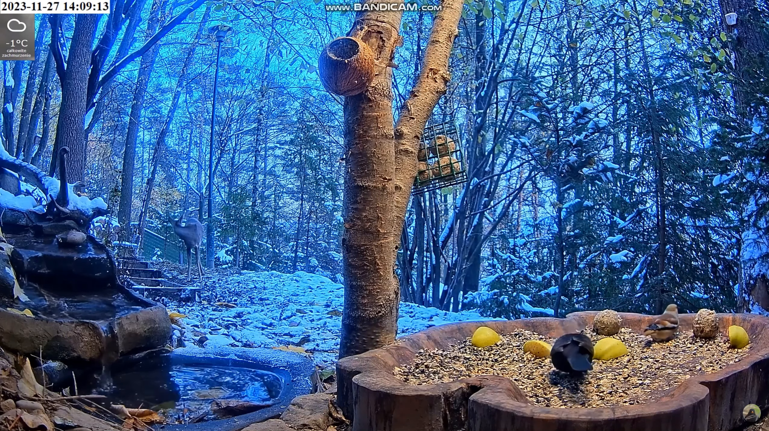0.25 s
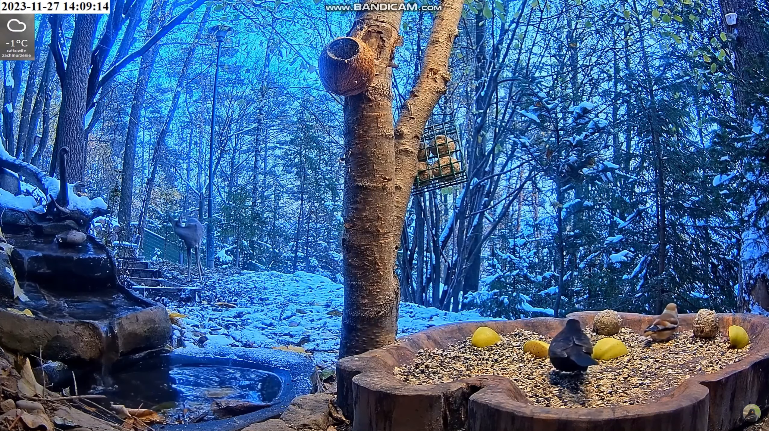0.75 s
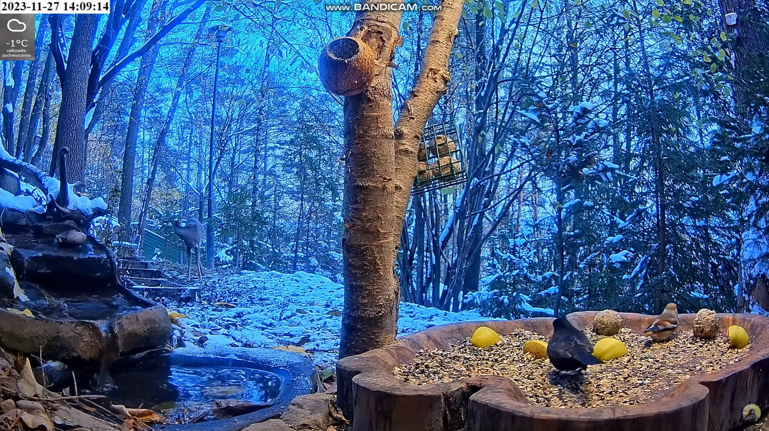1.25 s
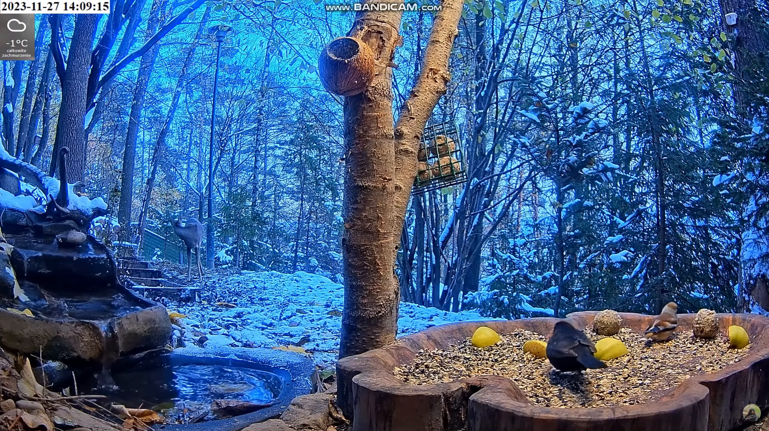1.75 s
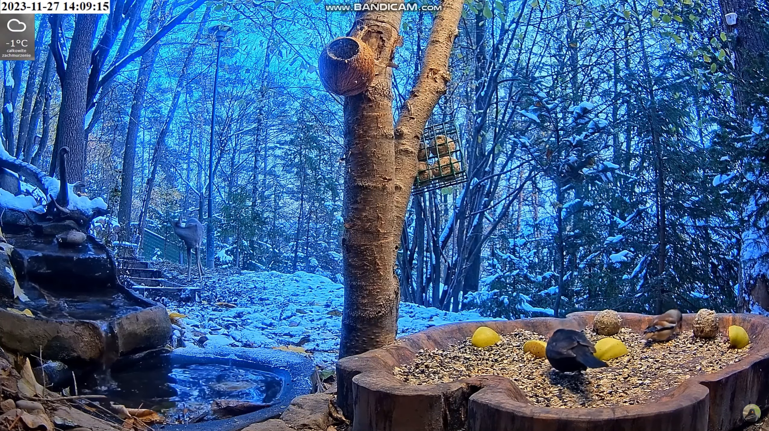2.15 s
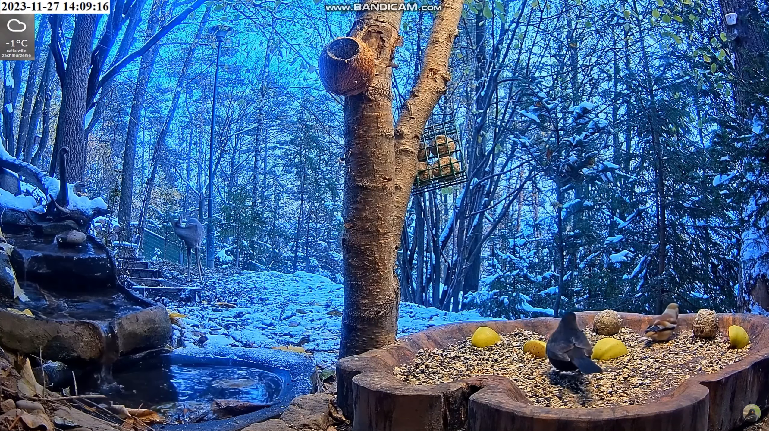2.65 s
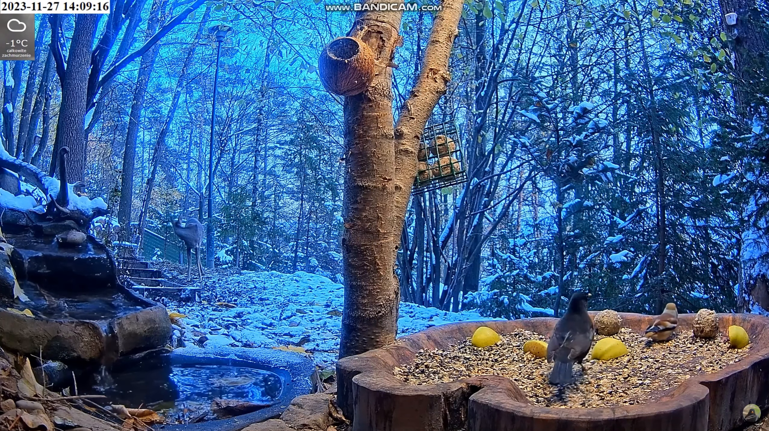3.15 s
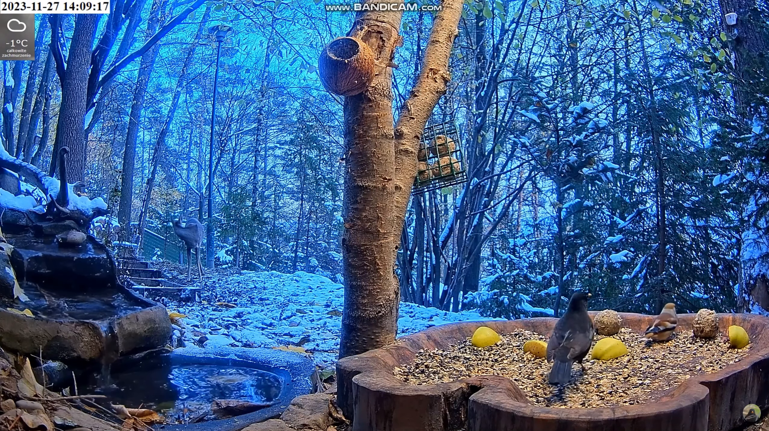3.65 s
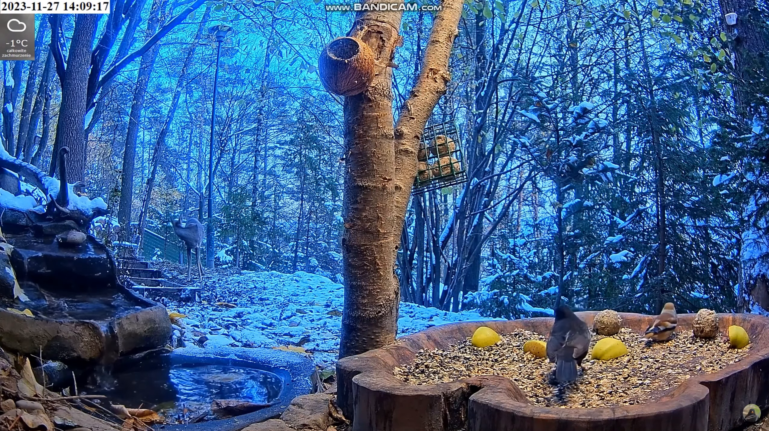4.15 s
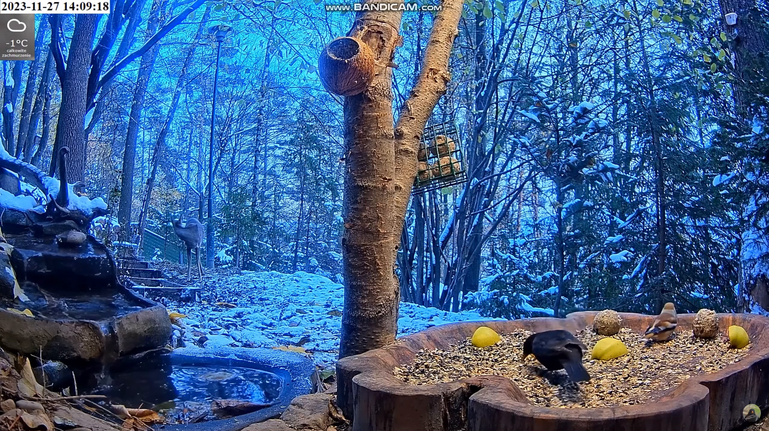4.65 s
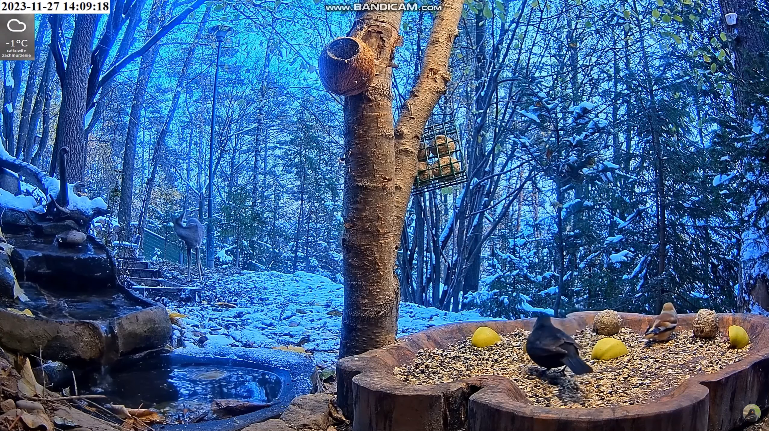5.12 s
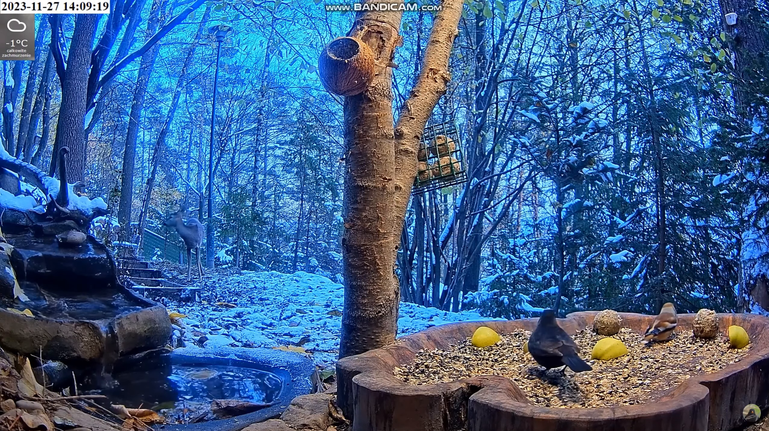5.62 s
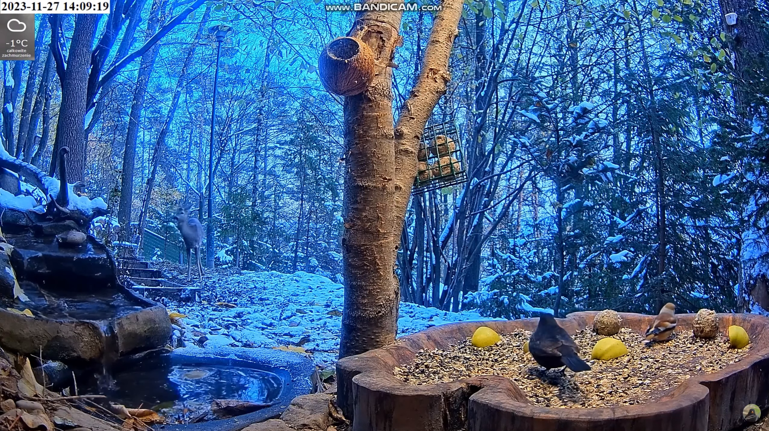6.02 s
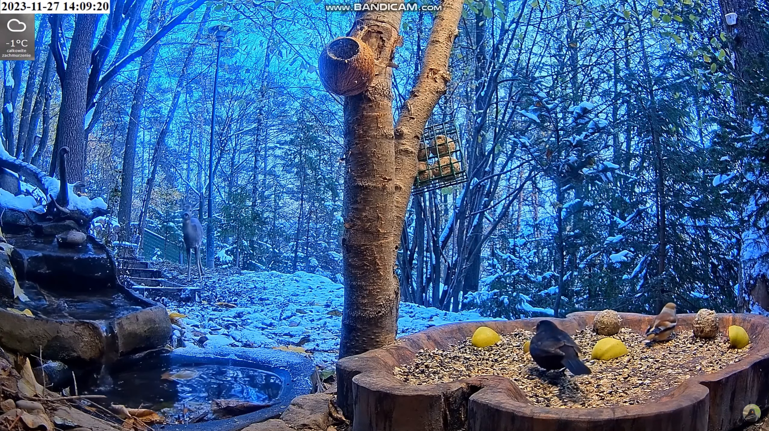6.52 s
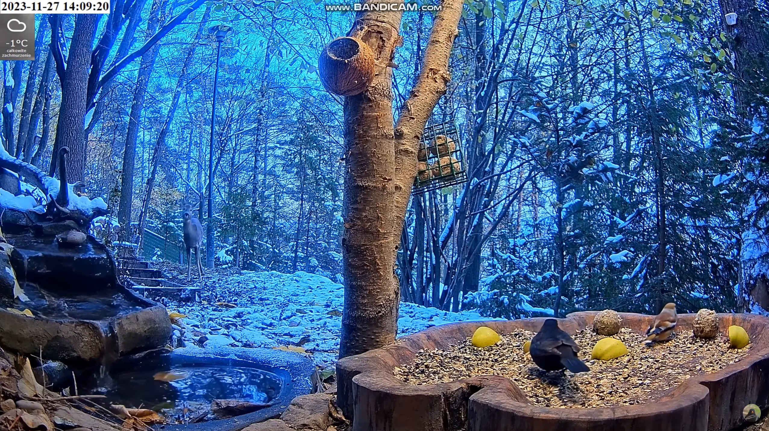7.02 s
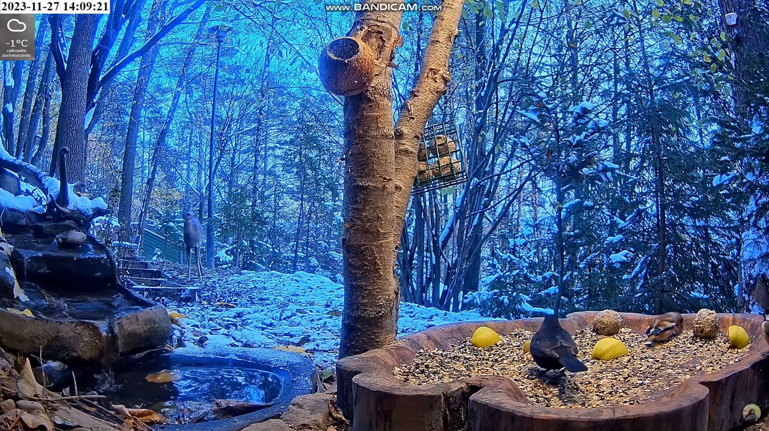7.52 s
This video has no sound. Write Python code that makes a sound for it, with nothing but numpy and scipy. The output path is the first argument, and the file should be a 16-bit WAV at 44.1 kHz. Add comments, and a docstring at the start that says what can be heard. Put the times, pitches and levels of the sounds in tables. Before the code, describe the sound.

In a quiet snowy wood, crisp water drops tick and spatter on rock while small bubbles ring and larger ones plop in a murmuring pool. The trickle flickers with tiny lulls and never stops. A muffled wing flutter passes just before five seconds, then a weaker one near the end. A small fixed camera microphone gives a thin, bright, resonant sound over faint hum, hiss and a slowly rising distant rush.

```python
"""From the start, a distant rush slowly grows over a faint mains hum and hiss in a winter forest.
A thin cascade trickles over rocks into a murmuring pool, as heard by a fixed outdoor camera.
At once drops tick and spatter, stone is tapped, and plunges gloop: splash noise plus ringing bubbles.
Stones and trunks echo and scatter the water sounds; weaker drops and bubbles fall at random times.
Near 4.7 s, and more weakly near 7.7 s, a small bird flutters: puffs of air with a feathery noise."""
import sys
import numpy as np
from scipy import signal
from scipy.fft import rfft, irfft, next_fast_len
from scipy.io import wavfile
from scipy.ndimage import uniform_filter1d

SR = 44100
rng = np.random.default_rng(int(sys.argv[2]) if len(sys.argv) > 2 else 0)


def unload_audio(sound):
    """Save the sound as a 16-bit wav file, at the path given as the first command line argument."""
    columns = np.transpose(np.atleast_2d(sound))
    # keep every value between -1 and 1, then stretch to whole-number steps
    steps = np.round(np.clip(columns, -1, 1) * 32767)
    wavfile.write(sys.argv[1], SR, steps.astype(np.int16))


N = 343098
TIME = np.arange(N) / SR  # t/s of the whole scene
GRAIN = np.arange(4096) / SR  # t/s within one short sound

# Levels in the tables are nominal: trims, channel balance and the final filters follow.
# Distant rush: initial level/dB and growth in dB/s
RUSH_DB, RUSH_DB_PER_S = -64.5, 0.7875
# Spectral density of the rush: [f/Hz, level/dB]
RUSH_SPECTRUM = [(25, -21), (80, -4), (150, -27.5), (280, 5), (430, -12.5), (600, 1), (760, -0.5),
                 (970, 7.5), (1150, 5), (1500, -5.5), (2100, -12), (2600, -14), (6000, -2), (14000, -37)]
# Spectral density of the rumble beneath it: [f/Hz, level/dB]
RUMBLE_SPECTRUM = [(25, -34), (80, -10), (120, -3.5), (170, -1.0), (250, -3.0), (310, -5.5),
                   (420, -2.0), (600, -7.0), (1500, -19), (14000, -69)]
# Mains hum partials: [f/Hz, rms level/dB]
HUM_PARTIALS = [(50, -72.5), (100, -80)]
# Spectral density of the hiss: [f/Hz, level/dB]
HISS_SPECTRUM = [(30, -3), (80, 0.5), (250, -3), (500, -2.0), (1000, -7.5), (2100, -6.0), (4500, -7.5),
                 (7000, -11.0), (9500, -9.5), (14000, -16.5)]
# Resonances of the camera housing: [f/Hz, width/Hz, level/dB]
HOUSING_MODES = [(1150, 1700, -15.5), (2521, 164, -1), (2778, 116, -8.5), (3090, 94, -7.5),
                 (3288, 200, -7.5), (3913, 160, -8.5), (4184, 140, 0), (4451, 192, 5), (4776, 790, -4),
                 (5353, 200, 2.5), (5560, 93, 0.5), (5770, 150, -0.5), (6160, 310, -1), (6448, 300, 2.5),
                 (7255, 390, 1), (8754, 480, -2), (10220, 480, -9.5), (10800, 960, -15),
                 (12300, 2800, -16.5)]
# Flow of the cascade: [t/s, fine trickle level/dB]
TRICKLE_FLOW = [(0.0, -55), (1.25, -54.5), (1.45, -54.5), (2.01, -52.5), (2.27, -55.5), (4.1, -54.5),
                (4.31, -56.5), (4.83, -51.5), (5.76, -54.5), (6.35, -57), (7.21, -52.5), (7.78, -55.5)]
# Moments when the stream thins: [t/s, length/s, level change/dB]
STREAM_LULLS = [(0.23, 0.026, -6), (0.906, 0.029, -7), (1.438, 0.033, -12), (3.07, .03, -5),
                (3.635, 0.043, -7), (4.29, 0.053, -3), (4.612, 0.021, -17), (5.286, .035, -16),
                (5.547, 0.042, -8), (5.787, .03, -15), (6.384, 0.039, -8)]
# Time a splash builds before its peak, in s
LEAD_S = .008
# Loudest drops on rock and water:
# [t/s, peak level/dB, bubble f/Hz, bubble over splash level/dB, relative top treble level/dB]
LOUD_DROPS = [(0.014, -41.5, 6440, -2, -38), (0.072, -36.5, 6660, 1, -32), (0.147, -44, 4220, 13, -30),
              (0.1915, -41, 4460, 22, -38), (0.199, -38.5, 5480, 14, -38), (0.258, -44.5, 5320, -3, -19),
              (0.3306, -39.5, 4450, 25, -36), (0.3735, -38, 4400, 26, -35), (0.399, -44, 4600, 19, -25),
              (0.4735, -33.5, 4370, 9, -40), (0.482, -38.5, 5100, 17, -37), (0.509, -45.5, 5400, 4, -25),
              (0.574, -39.5, 4480, -3, -23), (0.591, -41, 6270, -9, -7), (0.6555, -38, 4400, 5, -10),
              (0.807, -37, 6420, 2, -23), (0.842, -47, 6300, 9, -28), (1.0223, -34.5, 4430, 12, -38),
              (1.0405, -36, 5200, 23, -36), (1.136, -45.5, 4260, 0, -28), (1.147, -44, 6370, 0, -25),
              (1.212, -43, 5260, -7, -20), (1.263, -43.5, 4500, 0, -31), (1.28, -43, 4540, -5, -25),
              (1.397, -39, 5430, -18, -13), (1.5093, -32.5, 4410, 9, -39), (1.5275, -37.5, 4960, -2, -20),
              (1.647, -37, 3960, -11, -20), (1.674, -42, 7050, 7, -28), (1.819, -44.5, 5530, -5, -20),
              (1.858, -46, 5470, 5, -28), (1.8858, -39, 4070, 8, -36), (1.905, -40, 4540, -2, -31),
              (1.9415, -39, 7000, 15, -23), (1.9685, -34.5, 5320, 4, -29), (2.053, -48, 6200, -5, -25),
              (2.129, -52, 4500, -4, -23), (2.142, -39.5, 7100, 17, -28), (2.154, -41.5, 4440, 16, -23),
              (2.203, -42, 5400, -1, -25), (2.218, -35, 6080, 10, -32), (2.2346, -39.5, 5460, 16, -20),
              (2.327, -42, 5500, -3, -19), (2.351, -37, 4400, -1, -32), (2.368, -46, 4160, -11, -32),
              (2.404, -42.5, 6480, 7, -15), (2.4923, -32.5, 4550, -1, -25), (2.556, -42.5, 6100, 16, -25),
              (2.6875, -31.5, 4640, 1, -19), (2.72, -35, 4520, 22, -36), (2.776, -39, 6300, 0, -35),
              (2.843, -40.5, 6470, -13, -17), (2.925, -30.5, 4710, 8, -33), (3.089, -45, 4620, 1, -25),
              (3.115, -43, 4640, 9, -28), (3.15, -42, 5260, 12, -27), (3.188, -42.5, 6500, -4, -18),
              (3.327, -36.5, 4350, -1, -15), (3.3954, -35.5, 5400, -5, -23), (3.421, -38.5, 4380, 1, -17),
              (3.447, -44.5, 7260, 5, -25), (3.4966, -35.5, 4380, 20, -23), (3.543, -41.5, 4860, 14, -32),
              (3.722, -41, 5560, 0, -22), (3.7285, -36.5, 5660, -6, -24), (3.814, -42, 6420, -7, -21),
              (3.891, -45, 4460, 16, -22), (3.991, -41, 6030, 1, -16), (4.067, -42, 5480, -4, -27),
              (4.134, -37, 4420, -3, -22), (4.2068, -32.5, 6500, 20, -33), (4.386, -42, 4550, 0, -28),
              (4.426, -38, 4440, -8, -24), (4.5285, -37.5, 5360, 4, -23), (4.6195, -33.5, 5630, 8, -8.5),
              (4.669, -34, 4160, -8, -23), (4.692, -45, 6420, 9, -25), (4.766, -31, 4630, 0, -23),
              (4.773, -32.5, 4520, 2, -28), (4.81, -44, 4500, 12, -33), (4.85, -33, 4650, 22, -28),
              (4.871, -44, 4620, 17, -22), (4.8995, -43, 6540, 17, -5), (4.942, -58, 6400, 7, -25),
              (4.973, -41, 4630, -9, -16), (5.003, -39.5, 5200, 13, -13), (5.022, -41.5, 7350, 12, -20),
              (5.082, -38, 5360, 22, -21), (5.1485, -41, 7150, 4, -25), (5.173, -34.5, 5830, 4, -38),
              (5.258, -38, 7370, 10, -18), (5.304, -26.5, 5720, 7.5, -18), (5.3545, -39.0, 4330, 24, -39),
              (5.3915, -40, 6200, -11, -9.5), (5.446, -38, 5170, 14, -36), (5.5024, -31, 4520, 6, -32),
              (5.5287, -40, 6560, 18, -6.5), (5.58, -43, 4320, 5, -19), (5.614, -46, 5360, -8, -25),
              (5.644, -42, 4480, 10, -27), (5.756, -49, 4360, 0, -21), (5.8005, -40.5, 4400, -12, -15),
              (5.848, -48, 6500, 8, -25), (5.878, -51, 4530, -2, -7), (5.9145, -37.5, 4450, 10, -36),
              (5.977, -40.5, 5020, -9, -20), (6.078, -42.5, 7060, 0, -28), (6.177, -45, 6600, 0, -20),
              (6.294, -42.5, 4370, -1, -23), (6.3355, -38, 5300, 4, -33), (6.356, -44.5, 4370, 14, -30),
              (6.4695, -39, 6600, 13, -15), (6.492, -51, 5800, -4, -25), (6.513, -43, 4370, -4, -28),
              (6.529, -40, 4590, -17, -30), (6.69, -39.5, 5570, 15, -19), (6.716, -40.5, 6535, 7, -25),
              (6.775, -36.5, 6180, 1, -20), (6.886, -38, 4440, 4, -18), (6.988, -40.5, 6470, -12, -22),
              (7.024, -41, 5840, -4, -22), (7.0744, -30, 6200, -6, -21), (7.1478, -29.5, 6650, -1, -31),
              (7.193, -42, 4700, 8, -32), (7.201, -31.5, 6600, -4, -32), (7.243, -41, 5800, 7, -27),
              (7.266, -35, 6140, 7, -17), (7.314, -49, 4480, 9, -28), (7.4255, -39.5, 4350, 19, -29),
              (7.478, -44, 4570, 1, -14), (7.51, -43, 4690, -5, -27), (7.592, -36, 5300, 2, -12),
              (7.608, -35, 5520, 6, -36), (7.6377, -32.5, 5460, -13, -17), (7.7485, -34.5, 4760, -6, -17)]
# Hard taps on bare stone: [t/s, peak level/dB, echo level/dB]
STONE_TAPS = [(0.0485, -24.5, -1), (0.434, -45, -14), (3.727, -26.5, -19), (3.992, -34.5, -11),
              (4.2074, -30.5, -16), (5.8785, -37, -5), (7.149, -27.5, 2)]
# Loudest large bubbles in the pool:
# [t/s, peak level/dB, f/Hz, ring life/cycles, splash over bubble level/dB]
LARGE_BUBBLES = [(.085, -51, 980, 4.5, -13), (.147, -40.5, 775, 1.5, -11), (.303, -48.5, 980, 5, -24),
                 (.337, -41.5, 967, 4.2, -27), (.508, -46.5, 1116, 3.8, -6), (.571, -46.5, 1335, 8, -1),
                 (.629, -31, 967, 4.7, -15.5), (.656, -35, 1032, 3.9, -13), (.776, -48.5, 956, 10.6, -6),
                 (.833, -44.5, 713, 3.1, -15), (.872, -43, 714, 5.1, -22), (1.733, -46, 985, 4, -11),
                 (1.884, -39, 1160, 3.6, -9.5), (1.912, -38, 1000, 5.1, -11), (1.973, -45, 940, 5.2, -22),
                 (2.027, -42.5, 1025, 3.3, 0), (2.062, -45.5, 1027, 4.3, -7), (2.37, -47, 1020, 4.1, -8),
                 (2.485, -40.5, 980, 4.9, -23), (2.93, -48, 1143, 5.9, -14), (3.109, -46, 1124, 4, -15),
                 (3.232, -44.5, 982, 4.8, -20), (3.327, -43, 980, 4.1, -23), (3.721, -42, 968, 4.7, -24),
                 (3.816, -45, 990, 4.6, -17), (4.124, -55, 710, 5.2, -9), (4.14, -45.5, 994, 6.9, -8),
                 (4.209, -51, 672, 4.1, -1), (4.62, -48, 1430, 5.7, -20), (4.631, -35, 968, 6.1, -21),
                 (4.677, -44, 972, 4.9, -12), (4.698, -49, 1001, 2.2, 2), (4.773, -52, 1370, 9.2, -8),
                 (4.876, -48.5, 985, 7.2, -2), (4.972, -48, 930, 5.2, -5), (5.182, -48, 1140, 4.2, -21),
                 (5.469, -32, 942, 5.3, -20), (5.502, -45, 990, 3.5, -20), (5.88, -49.5, 671, 3.2, -21),
                 (6.588, -43.5, 910, 4.7, 3), (6.886, -44, 740, 3.4, -6), (6.95, -48.5, 1001, 4.6, -16),
                 (7.072, -46.5, 1120, 3.8, -6), (7.169, -46.5, 950, 7, -4), (7.687, -43, 1003, 5.5, 5)]
# Loudest middle-sized bubbles: [t/s, peak level/dB, f/Hz, splash over bubble level/dB]
MIDDLE_BUBBLES = [(0.475, -48, 3420, 4), (0.573, -47, 2610, -2), (0.6913, -44, 3260, -14),
                  (1.209, -43.5, 3300, -12), (1.261, -48, 3350, -13), (1.629, -38.5, 3310, -11),
                  (1.887, -45, 3280, 4), (1.9684, -37.5, 2610, 12), (2.029, -37, 2560, -1),
                  (2.0507, -39.5, 2530, 6), (2.114, -46, 2540, -12), (2.3268, -38, 2530, -14),
                  (2.4821, -37.5, 3060, -13), (2.6887, -43.5, 3430, 6), (2.908, -39.5, 2530, -29),
                  (3.199, -44, 2570, -2), (3.6521, -47, 2680, -15), (3.9677, -41.5, 2550, -6),
                  (3.999, -40, 3350, -2), (4.138, -35, 3150, 1), (4.207, -52, 3170, 7),
                  (4.6218, -33, 3320, -3.5), (4.7696, -38, 2550, -8), (5.238, -43.5, 2740, -18),
                  (5.483, -44, 2820, 8), (6.1702, -45, 2540, -20), (6.4994, -41.5, 2570, 4),
                  (6.648, -47, 2670, -17), (7.1024, -39.5, 3230, -1), (7.176, -52, 3350, 11),
                  (7.261, -45, 3270, -10), (7.43, -42, 2670, -7), (7.5952, -42, 3290, -3)]
# Soft wing beats: [t/s, peak level/dB, puff f/Hz]
WING_BEATS = [(4.712, -50, 220), (4.727, -50, 220), (4.757, -42, 255), (4.801, -43, 272), (4.846, -46, 288),
              (4.894, -49, 223), (7.732, -51, 250), (7.77, -52, 230)]
# Spectral density of the feather flutter: [f/Hz, level/dB]
FEATHER_SPECTRUM = [(40, -10), (90, 5), (150, -12), (230, 2), (300, 0), (480, -7), (900, -18), (4000, -30)]


def undb(db):
    """Logarithmic level: amplitude gain is ten to the power dB/20."""
    return 10 ** (np.asarray(db) / 20)


def unit(x):
    """Energy normalisation: scale to rms 1."""
    return x / np.sqrt(np.mean(x ** 2))


def crest(x, db, size=88):
    """Short-time peak level: root 2 times the greatest rms in a window of size samples."""
    return x * undb(db) / np.sqrt(2 * uniform_filter1d(x ** 2, size).max())


def curve(rows):
    """Linear interpolation: join (t/s, value) rows by straight lines."""
    return np.interp(TIME, *np.transpose(rows))


def add(track, s, sound):
    """Superposition: mix a sound into the track at time s."""
    i = int(np.clip(s * SR, 0, N - 1))
    track[..., i:i + sound.shape[-1]] += sound[..., :N - i]


def through(x, response):
    """Convolution: pass a sound through one impulse response, or one for each channel."""
    size = next_fast_len(len(x) + response.shape[-1], True)
    spectrum = rfft(x, size) * rfft(response, size)
    return irfft(spectrum, size)[..., :len(x)]


def walk(rate):
    """Smoothed random process: fresh values at this rate in Hz, with a spread near 1."""
    k = int(SR / rate)
    steps = np.repeat(rng.standard_normal(N // k + 1), k)
    return 1.3 * uniform_filter1d(steps, k)[:N]


def noise(colour):
    """Spectral shaping: white noise weighted by [f/Hz, level/dB] points, at rms 1."""
    hz, db = np.transpose(colour)
    bins = np.log(np.fft.rfftfreq(N, 1 / SR) + 1)
    gain = undb(np.interp(bins, np.log(hz), db))
    return unit(irfft(rfft(rng.standard_normal(N)) * gain, N))


def rush(low_db=-12.5):
    """Broadband distant noise: the forest's rush grows, with a rumble growing half as fast in dB."""
    waver_db = .5 * walk(12)
    growth = undb(RUSH_DB_PER_S * TIME + waver_db)
    far_noise = noise(RUSH_SPECTRUM) * growth
    rumble = noise(RUMBLE_SPECTRUM) * np.sqrt(growth)
    return undb(RUSH_DB) * (far_noise + undb(low_db) * rumble)


def hum():
    """Harmonic superposition: steady sinusoids of mains hum in the camera's wiring."""
    out = np.zeros(N)
    for hz, db in HUM_PARTIALS:
        out += np.sqrt(2) * undb(db) * np.sin(2 * np.pi * (hz * TIME + rng.random()))
    return out


def hiss(level_db=-70):
    """Incoherent noise: an independent faint hiss in each channel."""
    return undb(level_db) * np.array([noise(HISS_SPECTRUM) for _ in range(2)])


def housing(size=2048):
    """Minimum-phase resonance: causal response of the camera housing's steep-sided modes."""
    f = np.fft.rfftfreq(size, 1 / SR)
    power = sum(undb(db) ** 2 / (1 + ((f - hz) / width * 1.57) ** 2) ** 3 for hz, width, db in HOUSING_MODES)
    # folding the cepstrum onto positive time makes the response causal
    cepstrum = irfft(np.log(power + undb(-70) ** 2) / 2)
    cepstrum[1:size // 2] *= 2
    cepstrum[size // 2:] = 0
    return irfft(np.exp(rfft(cepstrum)))[:size // 2]


def rocks(echo_s=0.0038, echo_db=-5, scatter_db=-6, scatter_s=0.01, trees_db=-16, trees_s=0.015,
          apart_db=-5, pan_spread_db=-0.7, size=3000):
    """Multipath propagation: direct sound, one hard echo, decaying scatter from stones and trunks."""
    paths = np.zeros((2, size))
    for db, fade_s in ((scatter_db, scatter_s), (trees_db, trees_s)):
        shared = rng.standard_normal(size)
        separate = undb(apart_db) * rng.standard_normal((2, size))
        tail = (shared + separate) * np.exp(-GRAIN[:size] / fade_s)
        paths += undb(db) * tail / np.linalg.norm(tail[0])
    paths[:, 0] += 1
    paths[:, int(echo_s * SR * rng.uniform(.9, 1.1))] += undb(echo_db)
    pan_db = pan_spread_db * rng.standard_normal() * np.array([[.5], [-.5]])
    return paths * undb(pan_db)


def bubble(hz, life_s, rise, attack_s, size=2600):
    """Damped oscillation: a trapped bubble climbs in pitch near the surface; negative rise falls."""
    t = GRAIN[:size]
    age = t / max(life_s, 1 / SR)
    pitch = hz * (1 + rise * (np.minimum(age, 4) - 1))
    ring = np.sin(2 * np.pi * np.cumsum(pitch) / SR)
    return ring * np.exp(-age) * (1 - np.exp(-(t / attack_s) ** 2))


def strays(count, db, range_db, low_hz, high_hz):
    """Random point process: loosely spaced water releases as rows [t/s, level/dB, f/Hz]."""
    wait, size, pitch = rng.random((count, 3)).T
    s = (np.arange(count) + 2 * wait) % count / count * N / SR
    hz = low_hz * (high_hz / low_hz) ** pitch
    return np.column_stack([s, db + range_db * (size - .5), hz])


def lulls():
    """Amplitude modulation: bell-shaped dips in gain as the stream thins and recovers."""
    return undb(sum(db * np.exp(-(2 * (TIME - s) / length_s) ** 2) for s, length_s, db in STREAM_LULLS))


def trickle(body, count=960, spread_db=3.5, cycles=8, spray_db=0, spray_s=0.0015, spurt_s=0.006,
            gain_db=-1.5, spots=6, cluster=3):
    """Summed bubble resonances: spurts at several spots break into tiny bubbles in puffs of spray."""
    out = np.zeros((2, N))
    t = GRAIN[:600]
    for _ in range(spots):
        splashes = np.zeros(N)
        for s, db, spurt_hz in strays(count=count // spots, db=0, range_db=8, low_hz=2800, high_hz=8500):
            for wait, pitch, strength in rng.standard_normal((cluster, 3)):
                hz = min(spurt_hz * np.exp(0.2 * pitch), 11000)
                blip = unit(bubble(hz, cycles / hz, 0.057, 0.00082, size=len(t)))
                spray = unit(rng.standard_normal(len(t)) * t * np.exp(-t / spray_s))
                burst = (blip + undb(spray_db) * spray) * undb(db + spread_db * strength)
                add(splashes, s + spurt_s * wait, burst)
        out += through(through(splashes, body), rocks(scatter_db=-7, apart_db=6.0))
    return unit(out) * undb(curve(TRICKLE_FLOW) + gain_db) * lulls()


def gurgle(count=560, centre_hz=980, spread=0.296, life_s=0.0043, level_db=-65):
    """Incoherent superposition: many weak damped bubbles make the pool's steady murmur."""
    out = np.zeros(N)
    for (when, strength), pitch in zip(rng.random((count, 2)), rng.standard_normal(count)):
        hz = centre_hz * np.exp(spread * np.tanh(pitch / 2))
        add(out, when * N / SR, strength ** 2 * bubble(hz, life_s, 0.023, 0.0085))
    return unit(through(out, rocks(echo_db=-40))) * undb(level_db)


def splash(swell_s, fade_s, grit=0.67):
    """Impulsive noise: a swarm of minute impacts swells until LEAD_S, then decays."""
    t = GRAIN - LEAD_S
    impacts = rng.standard_normal(len(t)) * np.exp(grit * rng.standard_normal(len(t)))
    return impacts * np.exp(-np.maximum(-t / swell_s, t / fade_s))


def spatter(hz, spread=0.186, delay_s=0.01, life_s=0.0013, count=5):
    """Delayed secondary impacts: thrown droplets each ring a tiny bubble of their own pitch."""
    out = np.zeros(len(GRAIN))
    for pitch, strength, wait in zip(rng.standard_normal(count), rng.random(count), rng.exponential(size=count)):
        blip = bubble(min(hz * np.exp(spread * pitch), 10000), life_s, 0.052, 0.00018, size=500)
        start = min(int(wait * delay_s * SR), len(out) - len(blip))
        out[start:start + len(blip)] += blip * strength * np.exp(-wait / 2)
    return out


def drops(body, ring_s=0.0022, ring_swell_s=0.00088, pinch_s=0.0014, rise=0.0094, ring_gain_db=2.5,
          twin_db=-6, twin_spread=0.14, twin_s=0.0011, twin_delay_s=0.0045, spatter_db=-8,
          mist_db=1, mist_follow=0.88, stray_ring_db=-2, stray_top_db=-16, gain_db=0.0):
    """Impact and cavity resonance: each drop splashes, rings a bubble, and throws droplets and mist."""
    out = np.zeros((2, N))
    bright = signal.butter(3, 8600, "high", fs=SR, output="sos")
    band = signal.butter(4, [3500, 7900], "band", fs=SR, output="sos")
    lead = int(LEAD_S * SR)
    weaker = strays(count=30, db=-49.5, range_db=6, low_hz=4020, high_hz=6500)
    events = list(LOUD_DROPS) + [(*row, stray_ring_db, stray_top_db) for row in weaker]
    for s, db, hz, ring_db, top_db in events:
        drop = crest(signal.sosfilt(band, through(splash(0.0016, 0.0026), body)), 0)
        # the bubble pinches off a moment after the impact
        ring = crest(bubble(hz, ring_s, rise, ring_swell_s), ring_db + ring_gain_db)
        add(drop, LEAD_S + pinch_s * rng.random(), ring)
        # it tears off a weaker neighbour of another size
        twin_hz = hz * np.exp(twin_spread * rng.standard_normal())
        twin = bubble(twin_hz, twin_s, 2 * rise, ring_swell_s)
        add(drop, LEAD_S + twin_delay_s * rng.random(), crest(twin, ring_db + ring_gain_db + twin_db))
        drop = crest(drop, 0)
        drop[lead:] += crest(through(spatter(hz), body), spatter_db)[:-lead]
        add(out, s - LEAD_S, crest(through(drop, rocks()), db + gain_db))
        # a hit on bare rock makes more mist than one on water; its short waves scatter widely
        mist = signal.sosfilt(bright, through(splash(0.0021, 0.0041, grit=1.0), body))
        mist = through(mist, rocks(scatter_db=18, scatter_s=0.0047, apart_db=-4))
        add(out, s - LEAD_S, crest(mist, db + gain_db + mist_db + mist_follow * top_db))
    return out


def taps(body, ring_db=-4):
    """Impulse response and reflection: a dry, sharp click on stone with an echo close behind."""
    out = np.zeros((2, N))
    band = signal.butter(2, [3800, 7500], "band", fs=SR, output="sos")
    click = crest(signal.sosfilt(band, np.pad(body, (0, 2048))), 0)
    add(click, 0, crest(bubble(5500, .0004, 0, .0001), ring_db))
    for s, db, echo_db in STONE_TAPS:
        add(out, s, crest(through(click, rocks(echo_db=echo_db, scatter_db=-7)), db))
    return out


def froth(hz, life_s, spread, span_s, count=6):
    """Bubble fragmentation: small bubbles break off a big one and ring in a ragged, fading train."""
    out = np.zeros(len(GRAIN))
    for pitch, when in zip(rng.standard_normal(count), rng.random(count)):
        blip = bubble(hz * np.exp(spread * pitch), life_s, 0.03, 0.0013, size=1200)
        start = min(int(when * span_s * SR), len(out) - len(blip))
        out[start:start + len(blip)] += blip * np.exp(-when)
    return out


def pool(body, plink_s=0.0038, plink_db=-2.0, gloop_db=-0.5, rise=0.0029, slosh_s=0.0053,
         plink_froth_db=-8, gloop_froth_db=-14):
    """Volume resonance: bubbles trapped where the stream plunges ring, each born in its own splash."""
    out = np.zeros((2, N))
    wet = signal.butter(3, [2450, 4200], "band", fs=SR, output="sos")
    low = signal.butter(5, [700, 1330], "band", fs=SR, output="sos")
    weak_plinks = strays(count=10, db=-51, range_db=4, low_hz=2550, high_hz=3600)
    weak_gloops = strays(count=26, db=-55, range_db=3, low_hz=900, high_hz=1200)
    for s, db, hz, wet_db in [*MIDDLE_BUBBLES, *[(*row, 3) for row in weak_plinks]]:
        plink = crest(signal.sosfilt(wet, through(splash(0.0025, 0.0037, grit=0.73), body)), wet_db)
        add(plink, LEAD_S, crest(bubble(hz, plink_s, 0.011, 0.0014), 0))
        fragments = through(froth(1.25 * hz, 0.001, 0.252, 0.03), body)
        plink = crest(plink, 0) + crest(fragments, plink_froth_db)
        add(out, s - LEAD_S, crest(through(plink, rocks()), db + plink_db))
    for s, db, hz, cycles, wet_db in [*LARGE_BUBBLES, *[(*row, 5, -3) for row in weak_gloops]]:
        life_s = cycles / hz
        gloop = crest(signal.sosfilt(low, splash(0.0004, slosh_s)), wet_db)
        # a long-lived bubble also takes longer to pinch off
        ring = bubble(hz, life_s, rise, 1.86 * life_s, size=3600)
        add(gloop, LEAD_S - .003, crest(ring, 0))
        gloop = crest(gloop, 0) + crest(froth(hz, 0.0022, 0.093, 0.041), gloop_froth_db)
        # long waves bend round the stones and scatter less
        paths = rocks(echo_db=-9.5, scatter_db=-8.0, scatter_s=0.0049)
        add(out, s - LEAD_S, crest(through(gloop, paths), db + gloop_db))
    return out


def wings(push_s=0.0018, swish_db=-15, swish_s=0.041, gain_db=0.0):
    """Air displacement: each wing stroke shoves a short puff, with a low feather flutter trailing it."""
    out = np.zeros(N)
    air = noise(FEATHER_SPECTRUM)
    for s, db, hz in WING_BEATS:
        # the damped oscillation with falling pitch serves as the puff
        puff = crest(bubble(hz, push_s, -0.065, 0.0044), 0)
        start = rng.integers(N - len(puff))
        t = GRAIN[:len(puff)]
        swish = air[start:start + len(puff)] * np.exp(-t / swish_s) * (1 - np.exp(-t / 0.0015))
        add(out, s, crest(puff + undb(swish_db) * swish, db + gain_db))
    return signal.sosfilt(signal.butter(2, 105, "high", fs=SR, output="sos"), out)


def scene(balance_db=-5.0):
    """Linear superposition: sources reach both channels nearly alike, the right louder, plus hiss."""
    body = housing()
    water = trickle(body) + gurgle() + drops(body) + taps(body) + pool(body)
    sound = rush() + hum() + water + wings()
    sides = undb(np.array([[balance_db], [-balance_db]]) / 2)
    return sound * sides / sides.mean() + hiss()


def record(dry, dip_hz=2130, dip_width_hz=320, dip_db=-15, top_hz=14900):
    """Linear filtering: a narrow dip near 2.1 kHz thins the sound, and the top is cut."""
    notched = signal.lfilter(*signal.iirnotch(dip_hz, dip_hz / dip_width_hz, fs=SR), dry)
    # some of the removed band returns, so the dip has a finite depth
    dipped = notched + undb(dip_db) * (dry - notched)
    return signal.sosfilt(signal.ellip(8, .2, 70, top_hz, fs=SR, output="sos"), dipped)


dry = scene()
out = record(dry)
unload_audio(out)
```